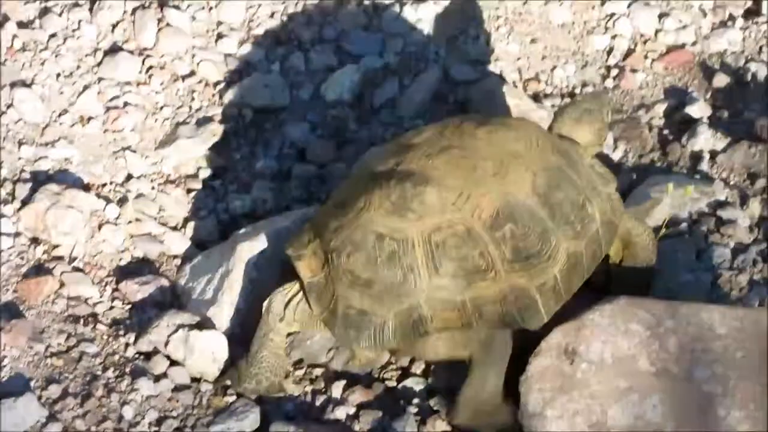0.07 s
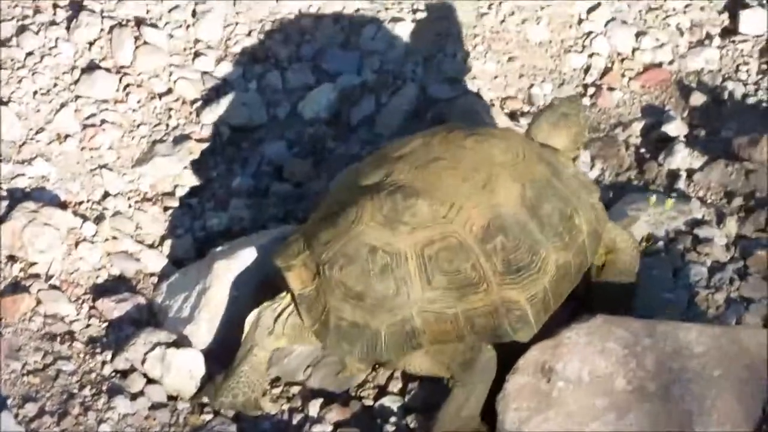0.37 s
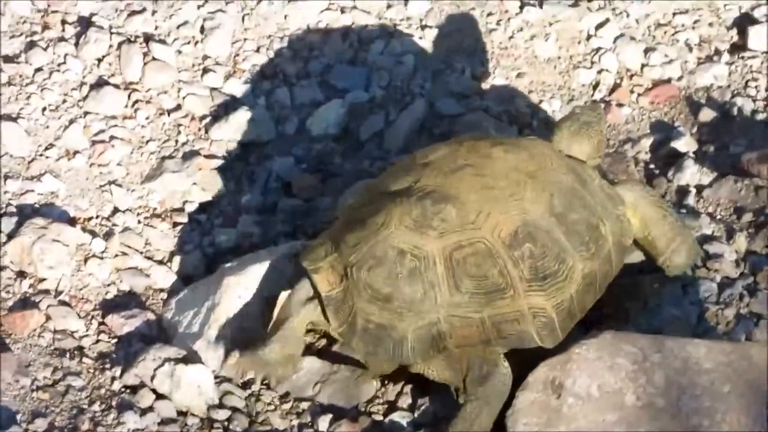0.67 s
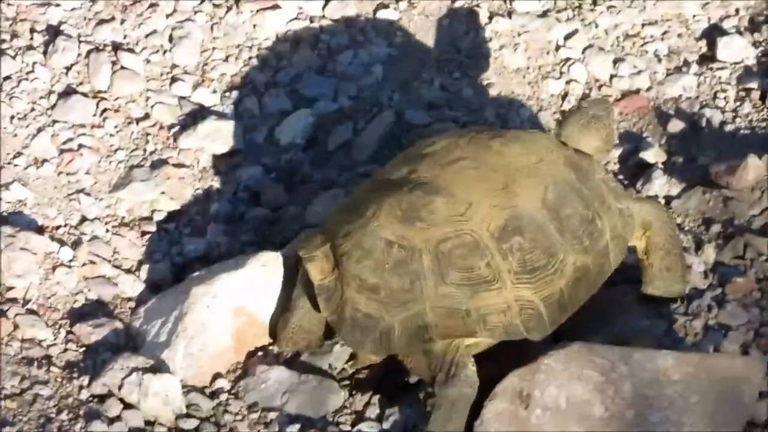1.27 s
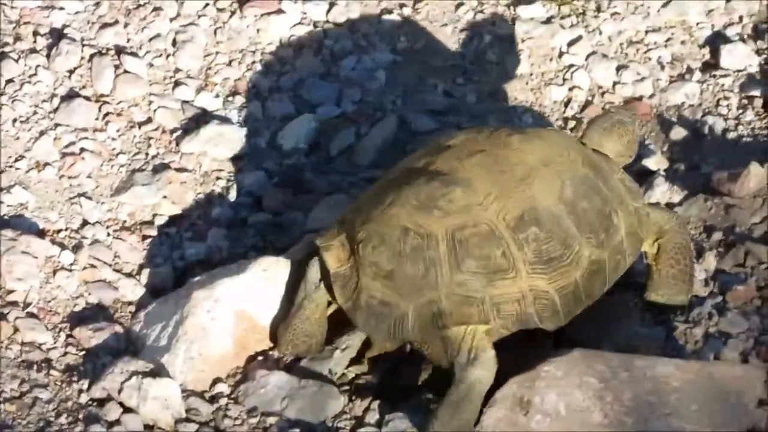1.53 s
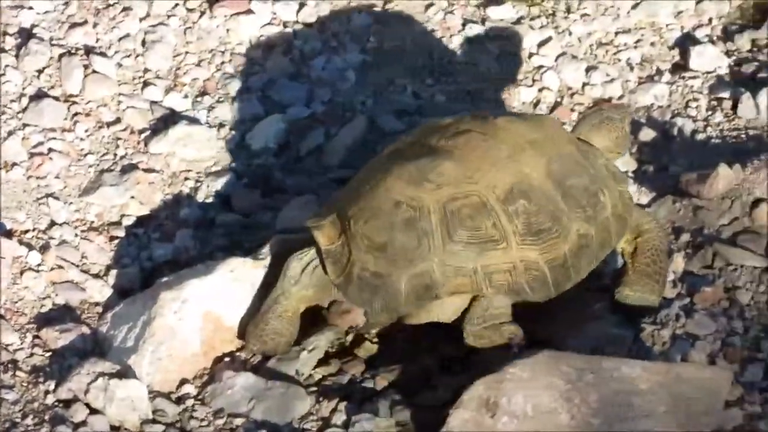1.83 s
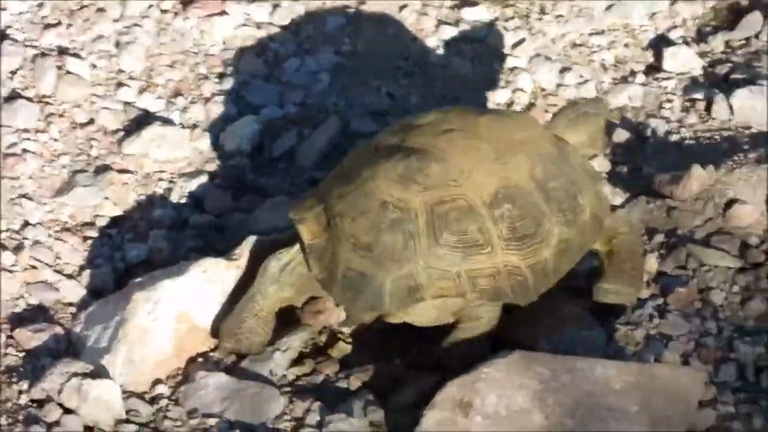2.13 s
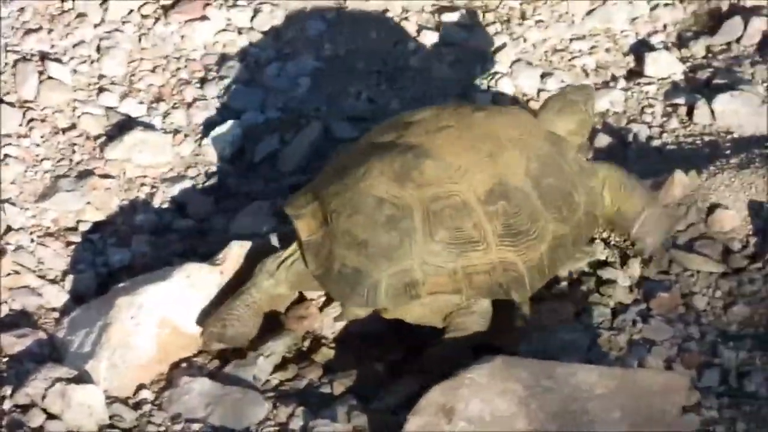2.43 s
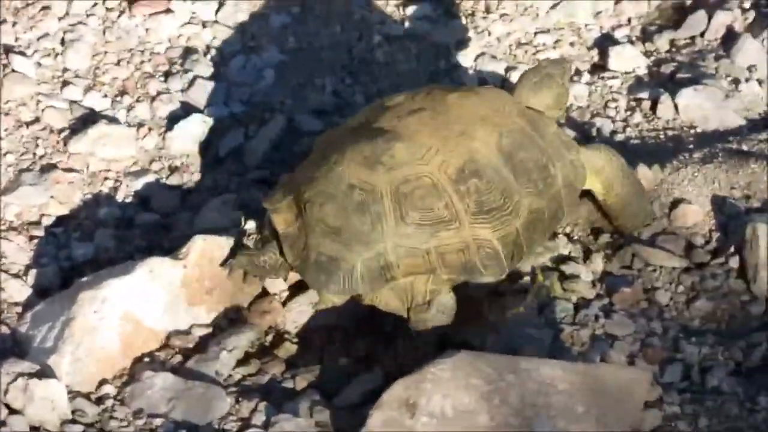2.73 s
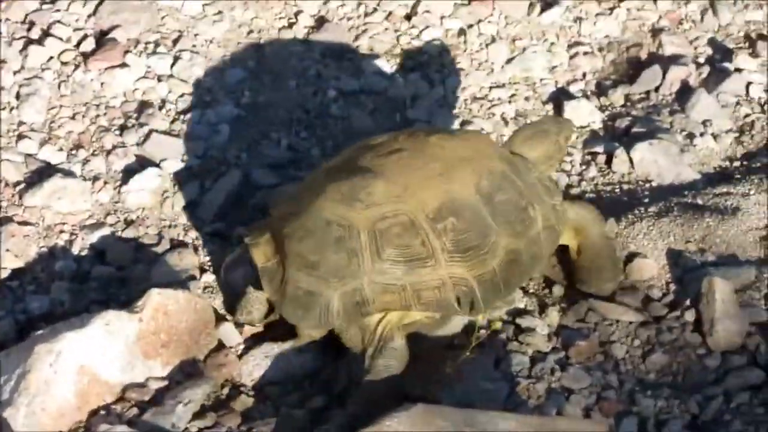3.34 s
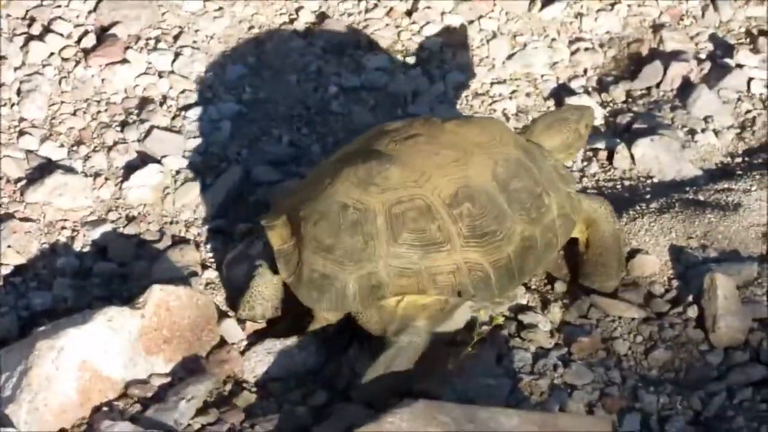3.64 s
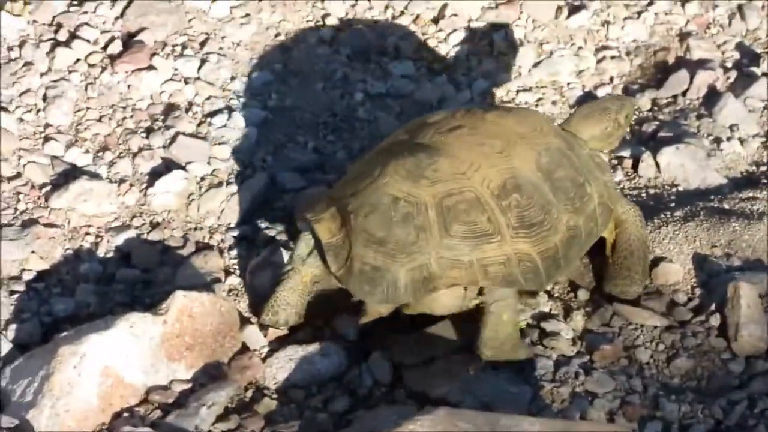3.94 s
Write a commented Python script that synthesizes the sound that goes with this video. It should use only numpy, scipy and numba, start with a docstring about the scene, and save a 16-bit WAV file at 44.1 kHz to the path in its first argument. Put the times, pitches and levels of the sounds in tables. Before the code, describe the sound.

Pebbles click under a slowly walking tortoise as wind rumbles on the microphone.

```python
"""A tortoise plods over a dry, stony creek bed; the open ground gives no echo.
From the start, rumble, hiss and a faint far drone lie under stray ticks of sand. A small hard piece
close by, probably a metal strap ring, clinks now and then, always with the same modes. The first of
three gusts buffets the microphone; pebbles tick, then grit scrapes under feet and shell. Midway the
ring rubs on its fitting and a stone knocks hollowly; the second gust follows, the third at the end."""
import sys
import numpy as np
from scipy import signal
from scipy.fft import rfft, irfft
from scipy.io import wavfile
from scipy.ndimage import uniform_filter1d
from numba import njit

SR = 44100
rng = np.random.default_rng(int(sys.argv[2]) if len(sys.argv) > 2 else 0)


def int16_out(signal):
    """Quantize to a 16-bit WAV file."""
    q = np.round(np.clip(np.atleast_2d(signal).T, -1, 1) * 32767)
    wavfile.write(sys.argv[1], SR, q.astype(np.int16))


N = 176400

# Modes of the ring struck on its face. Each row: frequency in Hz, relative level in dB, t60 in seconds.
RING_FACE_MODES = [(3350, -9, .011), (5604, 0, .072), (7585, -13.5, .052), (11150, -21, .05),
                   (12480, -22.5, .055)]


def undb(db):
    """Amplitude ratio of a level in decibels."""
    return 10 ** (np.asarray(db) / 20)


def unit(x):
    """Normalisation to rms 1."""
    return x / np.sqrt(np.mean(x ** 2) + 1e-20)


def add(out, start, sound):
    """Superposition: a sound joins the mix at a time in seconds."""
    i = int(start * SR)
    out[i:i + len(sound)] += sound[:max(N - i, 0)]


def fade(t, t60):
    """Exponential decay, 60 dB down at t60."""
    return np.exp(-np.log(1000) * t / t60)


def swell(start, length):
    """Half-sine envelope: a smooth rise and fall."""
    return np.sin(np.pi * np.clip((np.arange(N) / SR - start) / length, 0, 1))


def walk(per_s):
    """Linear interpolation between random values, rms 1."""
    hold = int(SR / per_s)
    steps = np.repeat(rng.standard_normal(N // hold + 1), hold)
    return unit(uniform_filter1d(steps, hold)[:N])


def band(x, hz, octaves):
    """Band-pass filter reaching the given octaves to each side of its centre."""
    edges = [min(hz / 2 ** octaves, SR / 3), min(hz * 2 ** octaves, SR * .45)]
    return signal.sosfilt(signal.butter(2, edges, "band", fs=SR, output="sos"), x)


@njit
def lowpass(x, hz, damping):
    """State-variable low-pass filter with a moving cutoff."""
    y, band_state, low_state = np.empty(len(x)), 0., 0.
    for i in range(len(x)):
        g = np.tan(np.pi * hz[i] / SR)
        mid = (band_state + g * (x[i] - low_state)) / (1 + g * (g + damping))
        y[i] = low_state + g * mid
        band_state, low_state = 2 * mid - band_state, 2 * y[i] - low_state
    return y


def noise(gain):
    """Spectral shaping: white noise weighted by a function of frequency, rms 1."""
    hz = np.arange(N // 2 + 1) * SR / N + 1e-6
    return unit(irfft(rfft(rng.standard_normal(N)) * gain(hz), N))


def resonance(hz, width_hz):
    """Random excitation of one narrow resonance, rms 1."""
    return noise(lambda f: 1 / (1 + ((f - hz) / width_hz * 2) ** 2))


def open_air():
    """Stationary broadband noise: the even rumble and hiss of the open air."""
    # Each row: frequency in Hz, relative spectral density in dB.
    spectrum = [(12, -40), (20, 3), (45, -7), (76, 1.5), (92, 0.5), (173, -9), (200, -15), (293, -18.5),
                (387, -21.5), (520, -24), (912, -24.5), (1080, -27.5), (1300, -26.5), (1770, -33),
                (2900, -39.5), (3900, -42), (8300, -40.5), (10300, -42.5), (11800, -47.5), (14900, -50)]
    hz, db = np.array(spectrum).T
    return undb(-42) * noise(lambda f: undb(np.interp(np.log(f), np.log(hz), db)))


def far_drone():
    """Narrow-band noise: a far machine hums in three steady bands and one that slowly swells."""
    # Each row: centre in Hz, width in Hz, rms level in dB.
    steady_bands = [(70.6, 9, -49), (1187, 34, -66.5), (1407, 16, -73.5)]
    # Each row: time in seconds, gain of the drone's lower body in dB.
    body_swell = [(0, -0.5), (.8, 0.5), (1.3, 8), (1.9, 1.5), (3.2, -5)]
    hum = sum(undb(db) * resonance(hz, width_hz) for hz, width_hz, db in steady_bands)
    body = unit(band(rng.standard_normal(N), hz=296.3, octaves=.22))
    body_db = -60.5 + np.interp(np.arange(N) / SR, *np.array(body_swell).T)
    return hum + undb(body_db) * body


def sand_grains(per_s):
    """Shot noise: tiny independent impacts of very uneven size, rms 1."""
    hits = rng.random(N) < per_s / SR
    size_db = 3.5 * np.minimum(rng.exponential(size=N), np.pi)
    impulses = hits * undb(size_db) * rng.choice([-1, 1], N)
    return unit(band(impulses, hz=4900, octaves=.97))


def click(hz, octaves, t60):
    """Impulsive contact of peak 1: an impact, a short crunch and faint scatter from the stones around."""
    t = np.arange(SR // 20) / SR
    force = rng.standard_normal(len(t)) * (fade(t, t60) + undb(-23) * fade(t, t60=.056))
    force[0] += undb(15)  # the impact itself
    dulling = signal.butter(2, 12000, fs=SR, output="sos")
    crack = signal.sosfilt(dulling, band(force, hz, octaves))
    return crack / np.abs(crack).max()


def ring_clinks():
    """Modal vibration: each contact clicks and sets the ring's modes sounding, detuned by its grip."""
    # Each row: start in seconds, drive of the face modes in dB, drive of the rim modes in dB,
    # click peak in dB, click centre in Hz, pitch shift in cents.
    clinks = [(.0848, -51.5, -53, -43, 7000, 3), (0.22, -43.5, -47, -52, 8000, 13),
              (.2275, -73, -43, -40, 9500, 10), (1.839, -50.5, -49, -39, 10000, 11),
              (2.175, -43.5, -70, -32, 9000, 6), (2.178, -85, -72, -37, 9500, 3.5),
              (2.3300, -35, -59, -21.5, 9500, 8), (2.3343, -31, -76, -26, 8500, -2),
              (2.394, -47.5, -67, -35, 9500, -2.5), (2.745, -61, -76, -56, 8000, 5),
              (3.7835, -48, -70, -47, 7000, 7)]
    # Modes of the ring struck on its rim. Each row: frequency in Hz, relative level in dB, t60 in seconds.
    rim_modes = [(8295, -6.5, 0.07), (11130, -21, .05), (14300, -20, .035)]
    out, t, pitch = np.zeros(N), np.arange(SR // 6) / SR, np.ones(N)
    for start, _, _, click_db, click_hz, cents in clinks:
        add(out, start, undb(click_db) * click(click_hz, octaves=.6, t60=.0078))
        pitch[int(start * SR):] = 2 ** (cents / 1200)
    starts, face_db, rim_db = np.array(clinks).T[:3]
    for modes, drives_db in ((RING_FACE_MODES, face_db), (rim_modes, rim_db)):
        for hz, mode_db, t60 in modes:
            envelope = np.zeros(N)
            for start, drive_db in zip(starts, drives_db):
                add(envelope, start, undb(drive_db + mode_db) * fade(t, t60))
            cycles = np.cumsum(hz * pitch) / SR + rng.random()
            out += uniform_filter1d(envelope, size=24) * np.sin(2 * np.pi * cycles)
    return out


def wind():
    """Turbulence: eddies thump the microphone; stronger gusts are louder and reach higher in frequency."""
    # One curve a gust. Each point: time in seconds, relative level in dB.
    gusts = [
        [(.14, -56), (.167, -30), (.195, -49), (.27, -38), (.315, -35.5), (.41, -53), (.48, -32), (.52, -63),
         (.56, -34.5), (.62, -58), (.655, -37), (.76, -56)],
        [(2.14, -39), (2.175, -34.5), (2.232, -28.5), (2.252, -40.5), (2.298, -21.5), (2.322, -34),
         (2.345, -24), (2.39, -21), (2.415, -32.5), (2.437, -18), (2.458, -29.5), (2.473, -18.5), (2.503, -26),
         (2.526, -21), (2.58, -35.5), (2.625, -39), (2.65, -31.5), (2.69, -46)],
        [(3.505, -59), (3.53, -29), (3.58, -46.5), (3.62, -50), (3.64, -28.5), (3.658, -50), (3.675, -30),
         (3.693, -39.5), (3.712, -28), (3.735, -37), (3.767, -29.5), (3.815, -50), (3.84, -28), (3.882, -45),
         (3.908, -22), (3.93, -28), (3.955, -25), (4, -23)],
    ]
    gust_fade_s, strong_db, eddy_db, octaves_per_db = .05, -25, 3, .042
    t, strength = np.arange(N) / SR, np.zeros(N)
    for gust in gusts:
        times, db = np.array(gust).T
        outside_s = np.maximum(np.maximum(times[0] - t, t - times[-1]), 0)
        strength += undb(np.interp(t, times, db)) * np.exp(-outside_s / gust_fade_s)
    excess_db = np.maximum(20 * np.log10(strength + 1e-9) - strong_db, -20)
    edge_hz = 178 * 2 ** (octaves_per_db * excess_db)
    buffet = rng.standard_normal(N) * undb(eddy_db * walk(per_s=86))
    for hz, damping in ((edge_hz, 2.), (edge_hz, np.sqrt(2)), (2 * edge_hz, np.sqrt(2))):
        buffet = lowpass(buffet, hz, damping)
    buffet = signal.sosfilt(signal.butter(1, 57.3, "high", fs=SR, output="sos"), buffet)
    running_rms = np.sqrt(uniform_filter1d(uniform_filter1d(buffet ** 2, size=1000), size=700))
    return undb(.5) * strength * buffet / running_rms


def pebble_ticks():
    """Impact noise: pebbles strike together, each contact a brief band-limited click."""
    # Each row: start in seconds, peak level in dB, centre in Hz, half-width in octaves.
    ticks = [(0.219, -45, 4630, 0.15), (0.234, -33.5, 4350, 0.79), (0.2352, -36, 4560, 0.54),
             (0.5877, -46.5, 5300, 0.35), (0.6152, -34.5, 4340, 0.54), (0.984, -44.5, 3800, 0.89),
             (1.006, -37, 8000, 1.6), (1.173, -45, 4200, 1.1), (1.454, -43.5, 9000, .9),
             (1.7554, -41, 2900, 0.65), (1.7639, -43, 2900, 0.45), (2.1755, -34.5, 5750, 0.14),
             (2.206, -53, 8500, .7), (2.2197, -46.5, 7000, .9), (2.2303, -42, 5500, 0.4),
             (2.2394, -40, 5400, 1.4), (2.242, -36, 6000, 0.34), (2.265, -34.5, 8000, 1.9),
             (2.2745, -55, 5500, 0.76), (2.3293, -38.5, 3280, 0.14), (2.4393, -41, 2900, 0.92),
             (2.513, -40, 4400, 0.86), (2.6554, -45.5, 6500, 1.6), (2.7213, -44, 4170, 0.75),
             (2.7307, -45, 3600, .9), (2.741, -47, 3480, 0.41), (2.797, -49, 2880, 0.23),
             (3.2077, -43, 8000, .8), (3.262, -45.5, 3000, 0.64), (3.3904, -38.5, 6000, 1.5),
             (3.456, -40, 7000, 1.7), (3.4927, -38.5, 6400, 0.54), (3.863, -47, 4500, 0.44),
             (3.9592, -40.5, 8160, 0.69)]
    out = np.zeros(N)
    for start, db, hz, octaves in ticks:
        add(out, start, undb(db) * click(hz, octaves, t60=.0064))
    return out


def grit_scrapes():
    """Granular friction: dense tiny impacts swell and fade under each dragged foot."""
    # Each row: start in seconds, length in seconds, rms level at the crest in dB.
    scrapes = [(.72, 0.071, -66), (1.67, 0.076, -64.5), (1.817, 0.047, -59.5), (2.183, 0.13, -61),
               (2.656, .11, -61.5), (2.785, 0.081, -66), (3.32, 0.24, -62.5)]
    grit = sand_grains(per_s=890)
    return sum(undb(db) * grit * swell(start, length) for start, length, db in scrapes)


def ring_rub():
    """Frictional excitation: the ring rubs lightly on its fitting and sounds its strongest face mode."""
    mode_hz = RING_FACE_MODES[1][0]
    return undb(-65) * swell(start=1.935, length=.093) * resonance(mode_hz, width_hz=180)


def stone_knock():
    """Heavily damped free vibration: a flat stone rocks onto another with a short, hollow knock."""
    # Each row: frequency in Hz, relative level in dB, t60 in seconds.
    stone_modes = [(810, -6, 0.011), (1010, 2.5, 0.014), (2030, -8, .008), (2840, -7.5, 0.008),
                   (12500, -9, 0.0033)]
    start_s, level_db = 2.0955, -38.5
    out, t = np.zeros(N), np.arange(SR // 20) / SR
    for hz, db, t60 in stone_modes:
        add(out, start_s, undb(level_db + db) * fade(t, t60) * np.sin(2 * np.pi * hz * t))
    return out


def scene():
    """Free-field superposition: all sources add at one microphone."""
    stray_sand = undb(-78.5) * sand_grains(per_s=25)
    ground = stray_sand + grit_scrapes() + pebble_ticks() + stone_knock()
    return (ground + ring_clinks() + ring_rub() + wind() + open_air() + far_drone())[None]


def record(dry):
    """Band limiting: an elliptic low-pass filter cuts the highest treble steeply."""
    top_hz = 14950
    return signal.sosfilt(signal.ellip(10, .2, 70, top_hz, fs=SR, output="sos"), dry)


dry = scene()
out = record(dry)
int16_out(out)
```